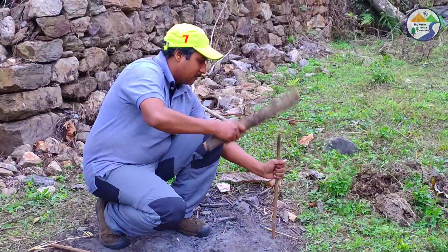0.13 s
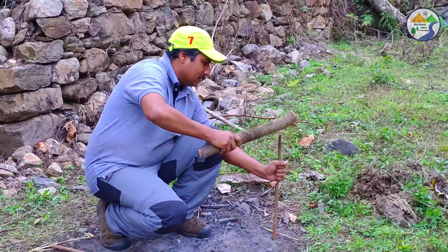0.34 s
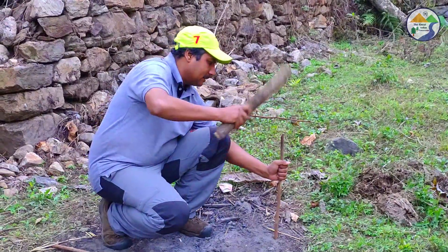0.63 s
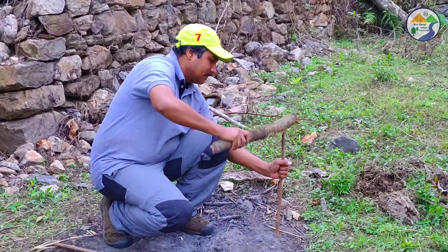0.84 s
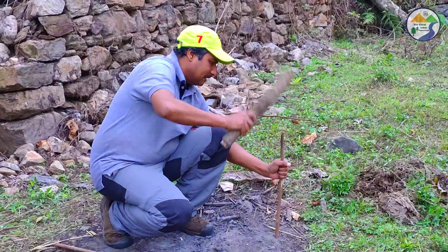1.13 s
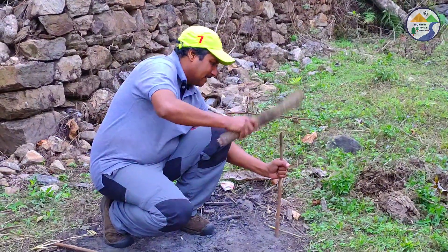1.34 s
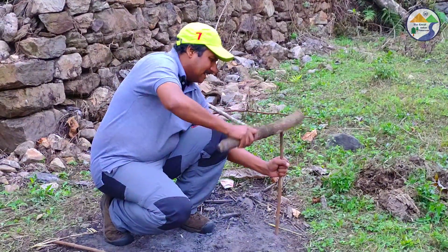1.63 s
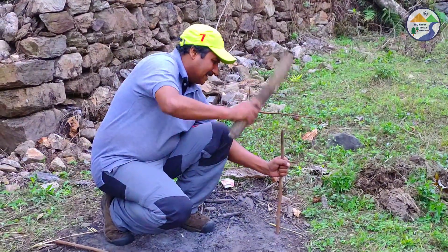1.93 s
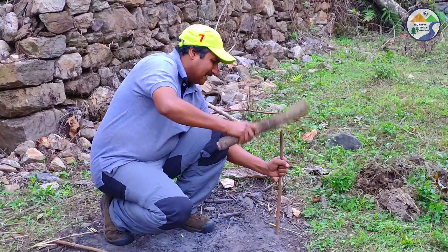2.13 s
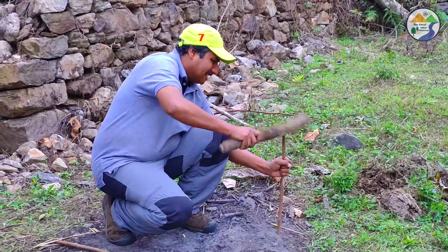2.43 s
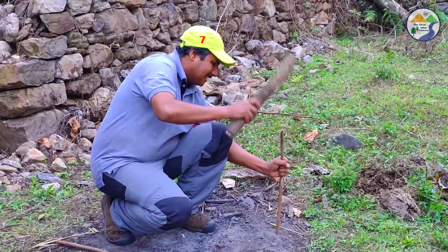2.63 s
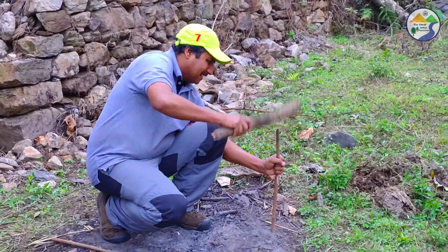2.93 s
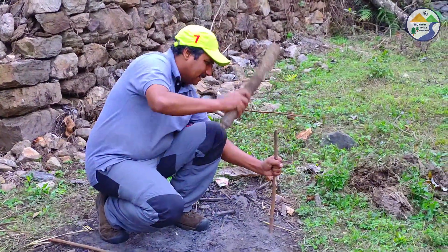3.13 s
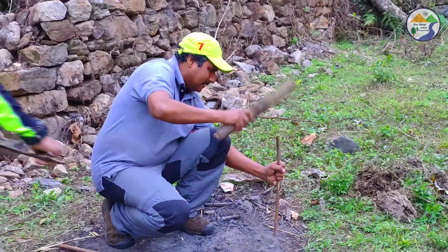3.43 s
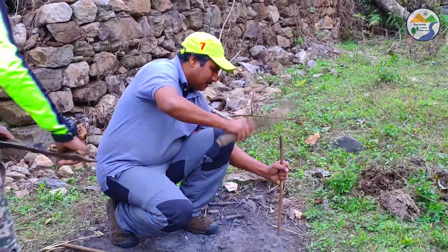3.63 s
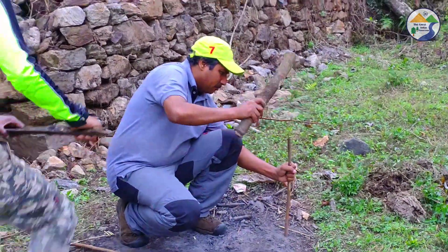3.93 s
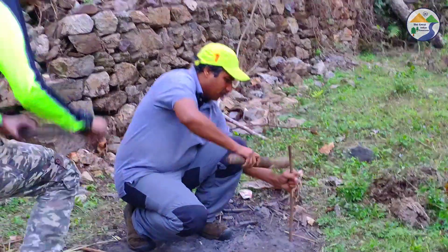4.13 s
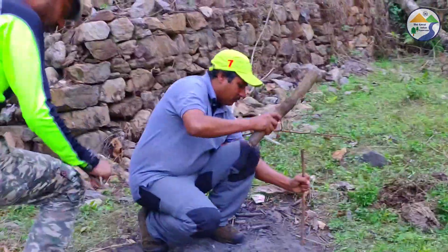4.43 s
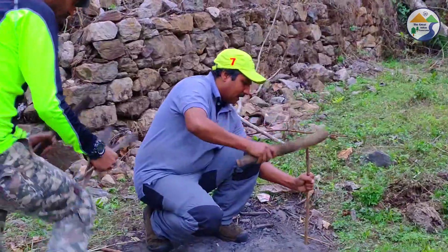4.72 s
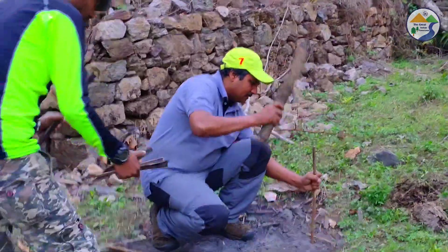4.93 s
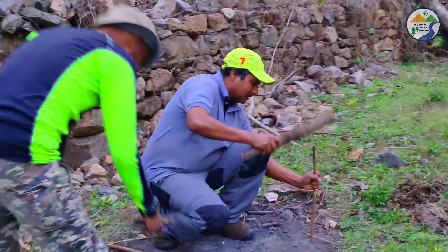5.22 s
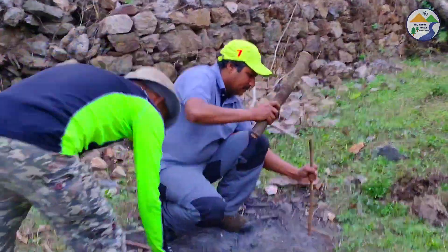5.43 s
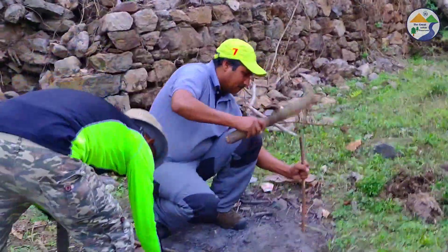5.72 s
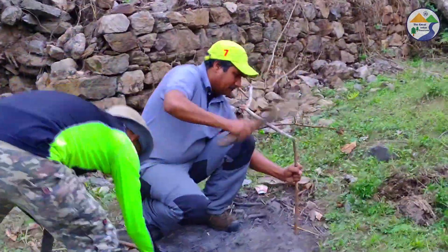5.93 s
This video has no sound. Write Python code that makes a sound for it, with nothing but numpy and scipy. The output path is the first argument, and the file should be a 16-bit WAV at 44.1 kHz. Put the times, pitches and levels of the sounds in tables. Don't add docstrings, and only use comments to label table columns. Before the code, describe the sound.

A wooden club knocks a thin stake into stony ground about every 0.4 seconds, with dry cracks, low soil thuds and clattering stones outdoors.

```python
import sys
import numpy as np
from scipy import signal
from scipy.io import wavfile

SR = 44100
rng = np.random.default_rng(int(sys.argv[2]) if len(sys.argv) > 2 else 0)


def natural_amplitude(level_db):
    exponent = np.asarray(level_db, float) / 20
    return 10 ** exponent


def transcribe(u):
    v = np.clip(np.atleast_2d(u).T, -1, 1)
    q = np.round(v * 32767).astype(np.int16)
    wavfile.write(sys.argv[1], SR, q)


N = 267246

# t/s, strength/dB, hardness at 2 kHz/dB, club ring/dB, club belly/dB
SQUARE_BLOWS = [(.7760, 1, -4, -35, 2), (1.1709, -.5, -.5, -36.5, 3), (1.5837, -2, 3, -39, -20),
                (1.9872, -.5, .5, -38, -14), (2.3822, -.2, .5, -41, -14), (2.789, -.5, .5, -45, -12),
                (3.203, 2.5, -.2, -45, -4), (3.6327, 2, -2, -35, -4), (4.073, -32, -7, -40, -1),
                (4.6535, -5.5, -5, -54, -12), (5.0816, 1.5, -.5, -39, 1), (5.9438, 2, -4, -27, 2)]
# t/s, strength/dB, skid/s, soil share/dB, club ring/dB
GLANCING_BLOWS = [(4.0325, -7.5, .0019, -7, -37), (5.5063, -3.5, .001, -2.5, -26)]
# f/Hz, level/dB, t60/s, sign of first motion
KNOCK_MODES = [(99, -18, .155, 1), (361, -8.9, .038, -1), (414, 1.7, .008, -1), (504, .1, .009, 1)]
# f/Hz, level/dB, t60/s, sign of first motion
DENT_MODES = [(1294, 0, .005, 1), (1366, -4.7, .011, -1)]
# f/Hz, level/dB, t60/s, sign of first motion
WOOD_MODES = [
    [(585, -25, .03, 1)],
    [(1767, -16.2, .03, 1)],
    [(2051, -24.4, .025, -1), (2183, -9.7, .012, -1)],
    [(2879, -20.6, .014, 1), (2970, -19.5, .023, 1), (3475, -21, .009, -1)],
]
# f/Hz, level/dB, t60/s, sign of first motion
CLUB_MODES = [(747, 4, .115, 1), (780.4, 4, .115, -1)]
# f/Hz, density/(dB per Hz)
CRACK_SPECTRUM = [(2060, -23), (3500, -5.5), (5550, -10), (6280, -18), (6920, -8), (11600, -18),
                  (13700, -19), (16500, -32)]
# f/Hz, level/dB, t60/s, sign of first motion
SOIL_MODES = [(65.6, -12.8, .047, -1), (114, -9.3, .079, 1), (171, -20.3, .11, 1), (232, -12.8, .021, -1),
              (243, -22, .072, 1)]
# f/Hz, level/dB, t60/s, sign of first motion
SWAY_MODES = [(180, -23, .09, 1), (315, -25, .05, -1)]
# low f/Hz, high f/Hz, level/dB, t60/s
SETTLING_EARTH = (48.5, 270, -40.5, 0.5)
# low f/Hz, high f/Hz, level/dB, t60/s
STAKE_SHUDDER = (325, 400, -37, .16)
# low f/Hz, high f/Hz, level/dB, t60/s
WALL_SCATTER = (1550, 2150, -51.5, 0.25)
# t/s, level/dB, main pitch f/Hz,
# brightness/dB
STONE_TAPS = [(.218, -43, 2600, -10), (.228, -46, 2200, -8), (.44, -38, 2900, -16),
              (2.44, -53.5, 1910, -11), (3.403, -37, 1250, -28), (3.4032, -43, 2100, -25),
              (3.603, -36, 2150, -32), (3.69, -47, 2000, -23), (4.0326, -9, 940, -35),
              (4.073, -43.5, 2200, -4.5), (4.124, -35, 2000, -10), (4.1245, -30, 4200, -22),
              (4.137, -41, 2300, -9), (4.196, -36, 2200, -10), (4.256, -51, 2200, 0),
              (4.325, -52, 1900, -23), (4.375, -52, 1990, -25), (4.574, -51, 2200, -10),
              (4.708, -36, 1850, -35), (4.791, -64, 3000, 4), (5.13, -41, 1790, -25),
              (5.152, -54, 1500, -20), (5.5065, -18, 1400, -30), (5.619, -43, 420, -19),
              (5.6195, -47, 2000, -12), (5.8668, -22, 2500, -17), (5.8842, -16.5, 1750, -17),
              (5.923, -50, 2000, 2)]
# t/s, level/dB,
# main pitch f/Hz, fade/s, brightness/dB
STONE_RUBS = [(.452, -40, 2700, .012, -8), (1.039, -53, 2440, .03, -27), (1.068, -50, 2200, .017, -34),
              (2.68, -54, 1500, .02, -37), (4.151, -40, 2020, .02, -13), (4.175, -43, 2600, .06, -4),
              (4.987, -46, 1225, .076, -37), (5.045, -47, 1280, .071, -31.5), (5.113, -46, 1700, .03, -28),
              (5.870, -25, 2100, .011, -18), (5.877, -39, 700, .02, -8), (5.885, -27, 1600, .022, -14),
              (4.0325, -17, 1750, .008, -32), (4.033, -20, 2850, .008, -35), (4.163, -36, 480, .012, -30),
              (5.5065, -14, 560, .006, -18)]
# f/Hz, level/dB, t60/s
SLAB_MODES = [(474, -32, 0.049), (1793, -3, 0.017), (2153, 0, 0.015), (2853, -5, 0.011), (3700, -8, 0.017),
              (4005, -6, 0.013), (4468, -9, 0.015), (5609, -14, 0.012), (6300, -6, 0.013),
              (7740, -8, 0.008), (8670, -7, 0.008), (9900, -10, 0.008), (13800, -21, .006)]
# t/s, level/dB, swell/s, hold/s, t60/s
SLAB_LANDING = (4.1615, -24, .004, .0025, .011)
# delay/s, low f/Hz, high f/Hz, level/dB, t60/s
TRICKLING_DUST = (.013, 6500, 11000, -47, .24)
# t/s, level/dB, swell/s, fade/s, upper bands/dB
SOLE_SCUFFS = [(1.03, -58, .02, .06, -20), (1.66, -60, .05, .12, -12), (2.02, -59, .02, .12, -14),
               (2.26, -60, .06, .12, -12), (2.44, -52, .05, .1, -5), (2.6, -61, .02, .04, -12),
               (4.19, -56, .03, .15, -6)]
# f/Hz, level/dB, t60/s
GRAVEL_MODES = [(1700, -6, .008), (1950, 0, .012), (2250, -4, .008), (3400, -6, .007), (4000, -2, .008),
                (4560, -2, .008)]
# t/s, level/dB
FOOTSTEPS = [(.225, -36), (.36, -39), (.435, -27.5), (0.989, -34.5), (4.1, -26.5), (4.149, -25.5),
             (5.62, -35.5)]
# t/s, length/s, start f/Hz, end f/Hz, top level/dB
BIRD_CHIRPS = [
    (2.127, .073, 3530, 3430, -60),
    (3.452, .063, 2870, 3200, -62),
]
# f/Hz, density/(dB per Hz)
AIR_SPECTRUM = [(12, -23.5), (20, -16.5), (31, -8.5), (49, -19.5), (53, -14.5), (91, -17), (163, -23.5),
                (367, -24.5), (1060, -34), (2140, -37), (3340, -43), (5530, -41.5), (6180, -45),
                (13500, -52.5), (16000, -65)]

RISE_S = .00035
SOIL_LAG_S = .0071


def blows():
    out, click = np.zeros(N), np.eye(1, SR // 3)[0]
    t = np.arange(len(click)) / SR
    low_knock, top_knock = struck(KNOCK_MODES[:-2], click), struck(KNOCK_MODES[-2:], click)
    dent, club, soil = struck(DENT_MODES, click), struck(CLUB_MODES, click), struck(SOIL_MODES, click)
    wood = [struck(part, click) for part in WOOD_MODES]
    for s, db, hard_db, soil_db, ring_db, belly_db in touches():
        white = rng.standard_normal((2, len(click)))
        shaft_db = -2.5 - .27 * belly_db
        face_db = .1 - .8 * max(db, -2.5)
        tip_db = 3 - 1.2 * s
        upper = natural_amplitude(.5 * hard_db) * dent
        for part_db, part in zip((belly_db, shaft_db, face_db, tip_db), wood):
            upper = upper + natural_amplitude(hard_db + part_db) * part
        knock = low_knock + natural_amplitude(.16 * belly_db) * top_knock
        add(out, natural_amplitude(db) * (knock + upper), s - RISE_S)

        burst = white * (natural_amplitude(-60 * t / .014) + natural_amplitude(-10 - 60 * t / .028))
        crack = coloured(burst, CRACK_SPECTRUM) / coloured(white, CRACK_SPECTRUM).std()
        crack_db = min(db + 8, 0) - 29 + 1.15 * hard_db
        add(out, natural_amplitude(ring_db) * club + natural_amplitude(crack_db) * crack, s)

        ground = soil + tail(white[0], *SETTLING_EARTH) + tail(white[1], *STAKE_SHUDDER)
        add(out, natural_amplitude(db + soil_db) * ground, s - RISE_S + SOIL_LAG_S)
        add(out, natural_amplitude(db + hard_db) * tail(white[1], *WALL_SCATTER), s + SOIL_LAG_S)
    for s, db, *_ in GLANCING_BLOWS:
        add(out, natural_amplitude(db) * struck(SWAY_MODES, click), s + SOIL_LAG_S)
    return out


def touches():
    rows = []
    for s, db, hard_db, ring_db, belly_db in SQUARE_BLOWS:
        soil_db = .6 + .45 * hard_db
        rows.append((s, db, hard_db, soil_db, ring_db, belly_db))
    for s, db, skid_s, soil_db, ring_db in GLANCING_BLOWS:
        belly_db = 1.7 * (ring_db + 26.5)
        rows.append((s, db, 4.5, soil_db, ring_db, belly_db))
        rows.append((s + skid_s, db - 8.5, 4.5 + 6, soil_db - 6, ring_db - 15, belly_db))
    return sorted(rows)


def stones():
    out = np.zeros(N)
    for s, db, hz, bright_db in STONE_TAPS:
        fade_s = max(.009 - .00015 * (db + 45), .002)
        add(out, natural_amplitude(db - 16.5) * stone(hz, .0007, fade_s, bright_db, 2.5), s)
    for s, db, hz, fade_s, bright_db in STONE_RUBS:
        add(out, natural_amplitude(db - 16.5) * stone(hz, .19 * fade_s, fade_s, bright_db, 0), s)
    return out


def stone(hz, swell_s, fade_s, bright_db, firm):
    t = np.arange(SR // 4) / SR
    draw = rng.random((3, len(t)))
    clicks = swell(t, swell_s, fade_s) * grit(draw, 6000., 3.5)
    clicks[0] = firm
    partials = [(.3, .15), (.68, .24), (.86, .9), (1.03, 1.3), (1.35, .26)]
    body = sum(ring(clicks, hz * ratio, 8.5 / hz) * share for ratio, share in partials)
    chips = sum(ring(clicks, chip_hz, .006) for chip_hz in 3500 * 2.6 ** draw[1, :4])
    dust = band(clicks, 3000, 9000)
    return band(body, .22 * hz, 8300) + natural_amplitude(bright_db + 9) * (.35 * chips + 2.5 * dust)


def slab():
    s, db, swell_s, hold_s, t60 = SLAB_LANDING
    out, t = np.zeros(N), np.arange(SR // 4) / SR
    crush = np.clip(t / swell_s, 0, 1) ** 2 * natural_amplitude(-60 * np.maximum(t - swell_s - hold_s, 0) / t60)
    clicks = crush * grit(rng.random((3, len(t))), 9000., 3.)
    modes = sum(natural_amplitude(mode_db) * ring(clicks, hz, min(ring_s, 30. / hz)) for hz, mode_db, ring_s in SLAB_MODES)
    landing = band(modes, 1600, 13500) + 1.8 * band(clicks, 5500, 11500) + .4 * band(clicks, 280, 520)
    add(out, natural_amplitude(db) * landing, s)
    delay_s, *dust = TRICKLING_DUST
    add(out, tail(rng.standard_normal(len(t)), *dust), s + delay_s)
    return out


def scuffs():
    out, t = np.zeros(N), np.arange(SR // 3) / SR
    for s, db, swell_s, fade_s, upper_db in SOLE_SCUFFS:
        clicks = swell(t, swell_s, fade_s) * grit(rng.random((3, len(t))), 8000., 3.)
        for hz, mode_db, t60 in GRAVEL_MODES:
            level_db = db - 12 + mode_db + (upper_db if hz > 3000 else 0)
            add(out, natural_amplitude(level_db) * ring(clicks, hz, t60), s)
    return out


def steps():
    out, push = np.zeros(N), np.r_[np.hanning(120) / 60, np.zeros(SR // 4)]
    for s, db in FOOTSTEPS:
        add(out, natural_amplitude(db + 5.5) * struck(SOIL_MODES, push), s)
    return out


def birds():
    out = np.zeros(N)
    for s, length_s, start_hz, end_hz, db in BIRD_CHIRPS:
        along = np.linspace(0, 1, int(length_s * SR))
        level_db = db + np.interp(along, [0, .66, 1], [-16, 0, -16])
        phase = 2 * np.pi * np.cumsum(start_hz + (end_hz - start_hz) * along) / SR
        add(out, np.sqrt(2) * natural_amplitude(level_db) * np.sin(phase), s)
    return out


def air():
    gust = drift(3.24)

    def patch(k):
        return natural_amplitude(.4 * gust + (3.0 - .1 * k) * drift(9.))

    return natural_amplitude(-52 + .9) * rms_one(coloured(rng.standard_normal((2, N)), AIR_SPECTRUM, patch))


def struck(modes, click):
    return sum(way * natural_amplitude(db) * ring(click, hz, t60) for hz, db, t60, way in modes)


def ring(clicks, hz, t60):
    r, w = natural_amplitude(-60 / (t60 * SR)), 2 * np.pi * hz / SR
    return signal.lfilter([0, np.sin(w)], [1, -2 * r * np.cos(w), r * r], clicks + 1e-18)


def tail(white, low_hz, high_hz, db, t60):
    return natural_amplitude(db - 60 * np.arange(len(white)) / SR / t60) * rms_one(band(white, low_hz, high_hz))


def grit(draw, per_s, uneven_db):
    born, size, sign = draw
    return rms_one((born < per_s / SR) * natural_amplitude(-uneven_db * np.log(size + .02)) * np.sign(sign - .5))


def swell(t, swell_s, fade_s):
    return np.minimum(t / max(swell_s, 1e-4), 1) * natural_amplitude(-30 * np.maximum(t - swell_s, 0) / fade_s)


def coloured(white, spectrum, gain=lambda k: 1):
    edges = 16800 * 2. ** np.arange(-10, .1, .5)
    out = 0
    for k, (low, high) in enumerate(zip(edges, edges[1:])):
        level = natural_amplitude(at_hz(spectrum, np.sqrt(low * high)))
        out = out + level * gain(k) * band(white[k % 2], low, high)
    return out


def at_hz(points, hz):
    f, db = np.array(points).T
    return np.interp(np.log(hz), np.log(f), db)


def band(x, low_hz, high_hz):
    return signal.sosfilt(signal.butter(2, [low_hz, high_hz], "band", fs=SR, output="sos"), x)


def drift(rate):
    return np.interp(np.arange(N) / SR * rate, np.arange(400), rng.standard_normal(400))


def rms_one(x):
    return x / np.sqrt(np.mean(x ** 2) + 1e-20)


def add(out, sound, s):
    at = int(round(s * SR))
    out[at:at + len(sound)] += sound[:N - at]


def scene():
    return (blows() + stones() + slab() + scuffs() + steps() + birds() + air())[None]


def band_limit(x):
    return signal.sosfilt(signal.butter(12, 16780, fs=SR, output="sos"), x)


def record(dry):
    clipped = np.clip(dry - .0077, -1, 1)
    top_cut = signal.cheby2(8, 50, 16400 + 900, fs=SR, output="sos")
    return band_limit(signal.sosfilt(top_cut, clipped))


dry = scene()
out = record(dry)
transcribe(out)
```